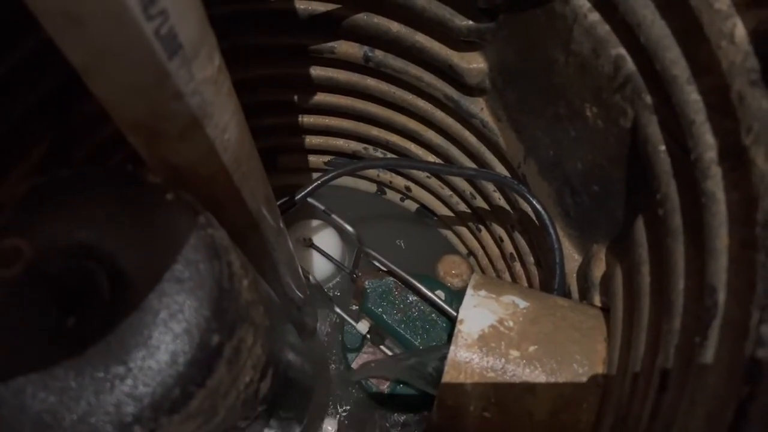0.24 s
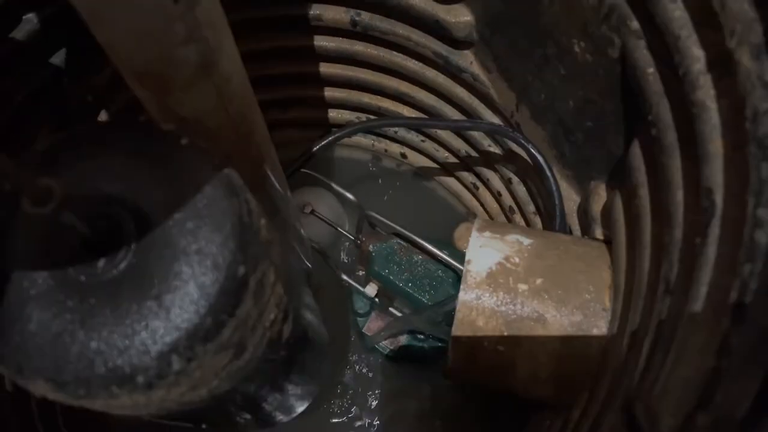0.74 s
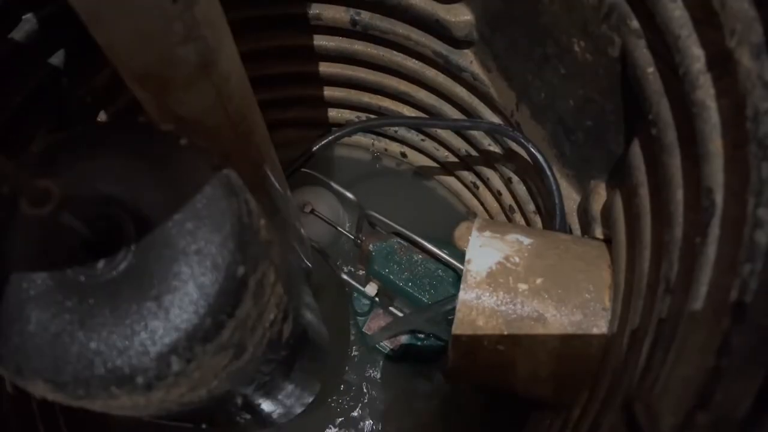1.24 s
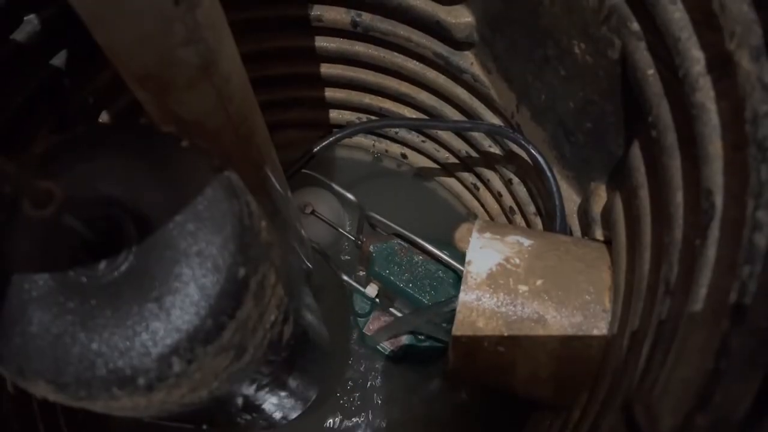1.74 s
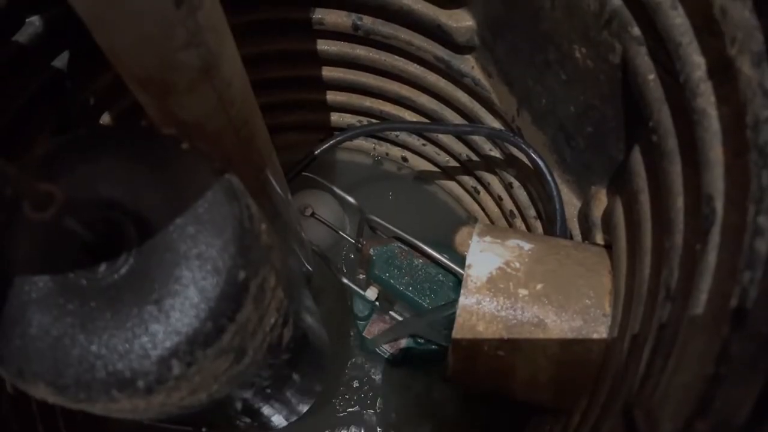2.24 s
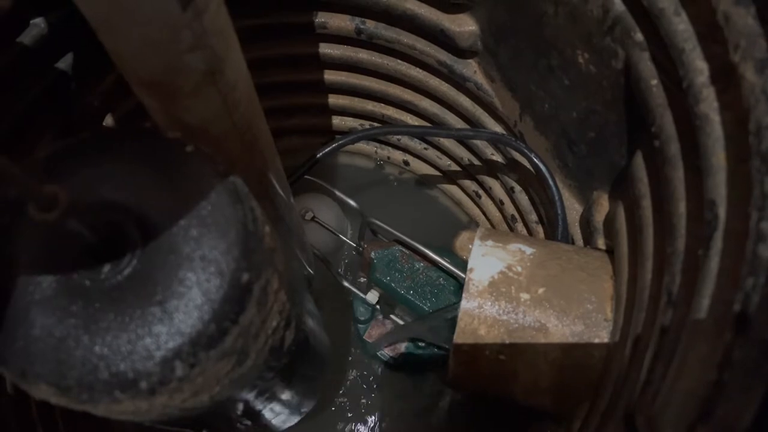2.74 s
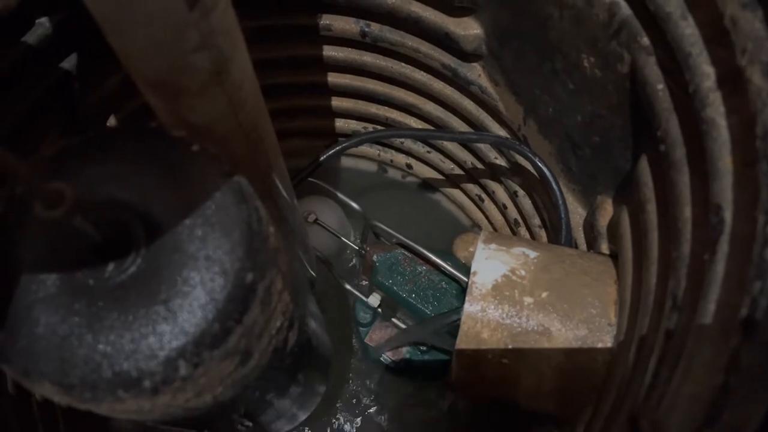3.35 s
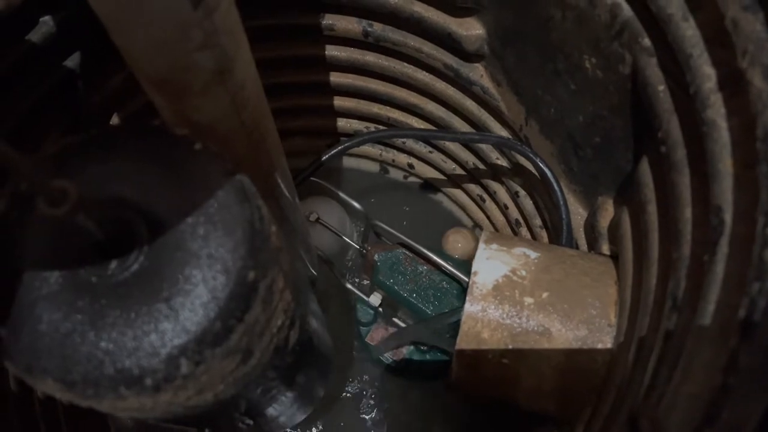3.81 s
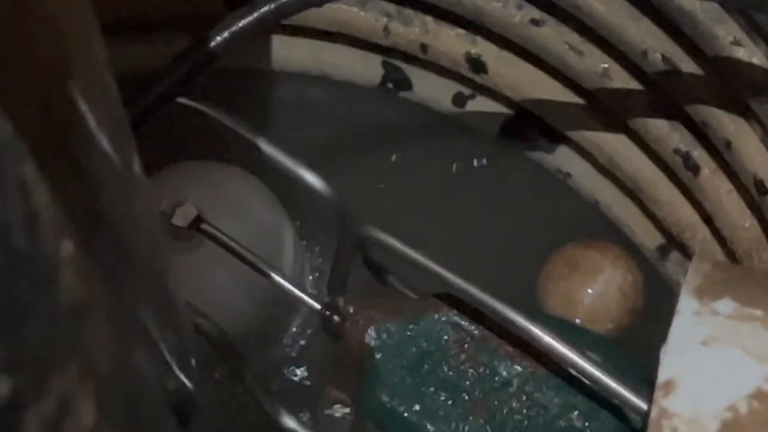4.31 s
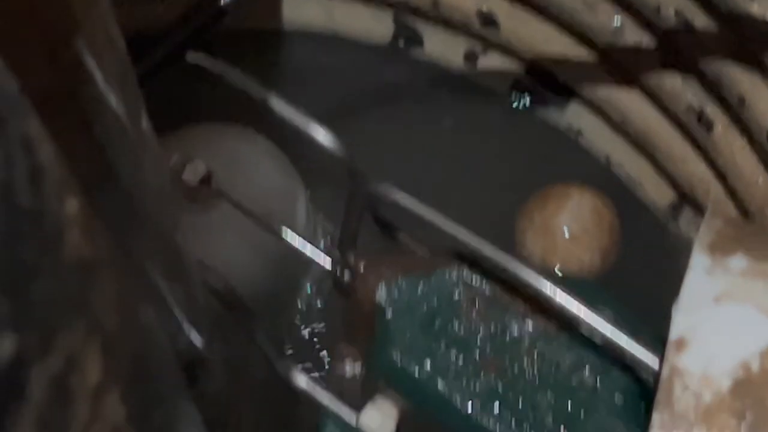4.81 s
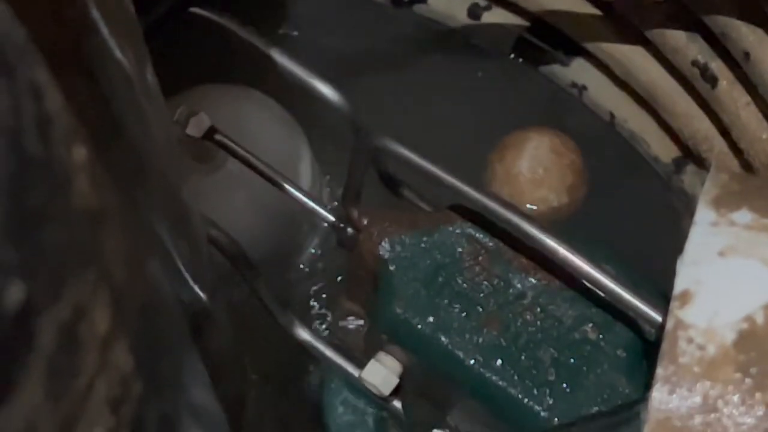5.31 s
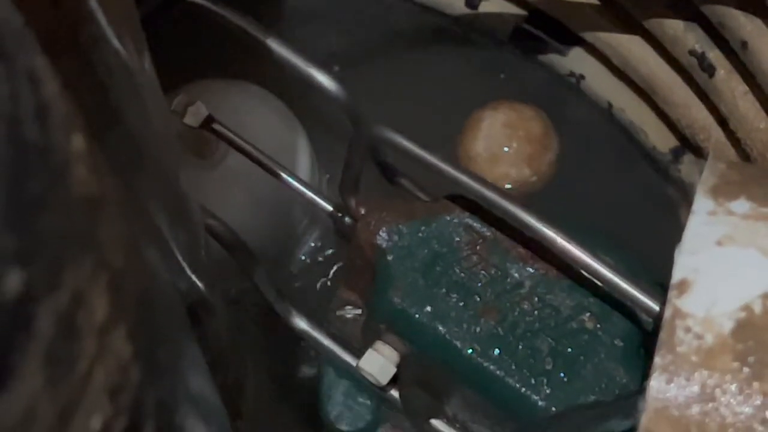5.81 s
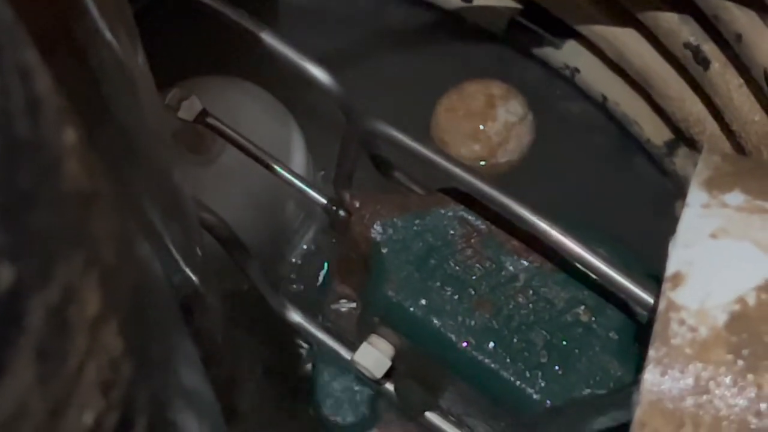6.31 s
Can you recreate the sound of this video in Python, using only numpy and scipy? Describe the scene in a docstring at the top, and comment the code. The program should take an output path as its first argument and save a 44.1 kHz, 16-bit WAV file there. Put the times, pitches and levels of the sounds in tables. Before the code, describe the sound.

In a basement, heard close above a ribbed plastic sump pit, the first 0.7 seconds hold only faint, hollow, wavering air, a thin hiss and tiny drips near 0.25, 0.4 and 0.6. At 0.72 drain water abruptly begins to splatter: irregular clumps of drops, crisp splashes, ringing plips and low hollow gulps, with short lulls around 1.5, 1.8 and 2.4 and a soft deep boom of stirred air. At about 2.44 the float clacks loudly and the switch snaps, a dry crack with a very high, brief ring and two weaker rebounds. A steady low motor hum near 120 Hz starts at once. From 2.55 to 2.8 a jet builds into dense, fizzing spray with fast gargling bubbles. It runs to the end at about 6.7, swelling slightly after 3.8 while the hum eases after 4, with a low shifting gurgle and bigger plops, a strong boomy one near 5.0.

```python
"""Basement, just above the rim of a ribbed plastic sump pit with a submersible pump in it.
Quiet air with a few faint drips, then drain water splatters and plops: bursts of tiny impacts and ringing bubbles.
A float clacks, its switch snaps (a crack and a high ring) and the motor hums near twice the mains frequency.
A jet from the weep hole sprays (random drops, filtered) and churns the water (a shifting resonance)."""
import sys
import numpy as np
from scipy import signal
from scipy.fft import rfft, irfft, next_fast_len
from scipy.io import wavfile
from scipy.ndimage import map_coordinates

SR = 44100
rng = np.random.default_rng(int(sys.argv[2]) if len(sys.argv) > 2 else 0)


def transcribe(u):
    """Save the signal u as a 16-bit wav file named by the first command-line argument.

    u: samples, shape (n,) or (channels, n), limited to [-1, 1]; the rate is SR.
    q: integer samples, one column per channel.
    """
    v = np.clip(np.atleast_2d(u).T, -1, 1)
    q = np.round(v * 32767).astype(np.int16)
    wavfile.write(sys.argv[1], SR, q)


N = 289296
TIME = np.arange(N) / SR
INFLOW_START, INFLOW_RISE_S = .72, .0039  # the water sound begins all at once
JET_START, JET_BUILD_S = 2.547, .23  # pressure builds as the impeller comes up to speed
INFLOW_WIDTH = 4.9  # drain water falls near the wall, so its echoes differ more between left and right
# ring length in cycles, spread in time, relative spread in pitch
BUBBLE = dict(cycles=6.6, spread_s=.0038, scatter=.059)


def amp(db):
    """Turns decibels into a gain."""
    return 10 ** (np.asarray(db) / 20)


def evened(x):
    """Scales to an rms of one."""
    return x / np.sqrt(np.mean(x ** 2) + 1e-20)


def read(points, hz):
    """Reads a table between its points, on a log-frequency axis."""
    f, value = np.transpose(points)
    return np.interp(np.log(hz + 1), np.log(f + 1), value)


def level(rows):
    """Reads a (t/s, level/dB) curve at every sample."""
    return np.interp(TIME, *np.transpose(rows))


def add(mix, s, sound):
    """Mixes a sound in at time s."""
    part = mix[max(round(s * SR), 0):][:len(sound)]
    part += sound[:len(part)]


def onset(start, rise_s):
    """Gain that climbs in a straight line from silence to one and holds."""
    return np.clip((TIME - start) / rise_s, 0, 1)


def chance_times(per_s):
    """Random moments from the start of the inflow on."""
    return rng.uniform(INFLOW_START, N / SR, round(per_s * (N / SR - INFLOW_START)))


def wander(hz):
    """Slow random drift of unit rms, with little movement faster than about hz."""
    size = next_fast_len(N)
    f = np.fft.rfftfreq(size, 1 / SR)
    spectrum = rfft(rng.standard_normal(size)) / (1 + (f / hz) ** 4)
    return evened(irfft(spectrum)[:N])


def colour(x, points, modes=(), size=4096):
    """Filters without pre-echo, from a spectrum with peaks and dips; white noise keeps its power."""
    hz = abs(np.fft.fftfreq(size, 1 / SR))
    db = read(points, hz) + sum(lift / (1 + (2 * (hz - f) / width) ** 2) for f, width, lift in modes)
    # The Hilbert transform of the log gain gives the minimum phase.
    taps = np.fft.ifft(np.exp(np.conj(signal.hilbert(np.log(amp(db)))))).real
    return signal.oaconvolve(x, taps / np.linalg.norm(taps))[:len(x)]


def mottle(x, depth_db, patch_s=.03, patch_octaves=.2493):
    """Shifting colour: patches of the spectrum swell and fade independently, less so in the treble."""
    hz, t, z = signal.stft(x, SR, nperseg=512, noverlap=384)
    places = np.meshgrid(np.log2(1 + hz / 500) / patch_octaves, t / patch_s, indexing="ij")
    field = evened(map_coordinates(rng.standard_normal((64, 512)), places, order=1, mode="wrap"))
    gain = amp(depth_db * field / (1 + hz[:, None] / 5000))
    gain = gain / np.sqrt(np.mean(gain ** 2, 1, keepdims=True))  # mean power gain of one at each frequency
    return signal.istft(z * gain, SR, nperseg=512, noverlap=384)[1][..., :N]


def resonate(x, hz, width):
    """A resonance that follows the curve hz: shift down to zero, smooth, shift back up."""
    turn = np.exp(2j * np.pi * np.cumsum(hz) / SR)
    r = np.exp(-np.pi * width / SR)
    return 2 * (turn * signal.lfilter([1 - r], [1, -r], x / turn)).real


def droplets(count, per_s, spread_db):
    """Random impacts, many small and a few large, over count samples."""
    size = amp(spread_db * np.minimum(rng.exponential(1, count), 4))
    sign = rng.choice([-1, 1], count)
    return evened(size * sign * (rng.random(count) < per_s / SR))


def plink(hz, cycles, rise=.034):
    """A trapped bubble rings for some cycles, rising in pitch as it nears the surface."""
    age = np.arange(SR // 16) / SR / min(cycles / hz, .01)  # decay time is 10 ms at most
    pitch = hz * (1 + rise * (np.minimum(age, 2) - 1 / 2))
    return (1 - np.exp(-3 * age)) * np.exp(-age) * np.sin(2 * np.pi * np.cumsum(pitch) / SR)


def cluster(hz, cycles, spread_s, scatter, count=11):
    """A pocket of air breaks into bubbles of nearly one size; as strong as 10 ms at unit rms."""
    out = np.zeros(SR // 8)
    delays, shifts = rng.gamma(2, 1, count), rng.standard_normal(count)
    for late, shift, size in zip(delays, shifts, rng.uniform(-.93, 1, count)):
        add(out, late * spread_s, size * plink(hz * np.exp(scatter * shift), cycles))
    return out / np.sqrt(np.sum(out ** 2) / (.01 * SR))


def froth(per_s, cycles, spread_db, count=24):
    """Random bubbles of all sizes, somewhat stronger toward high pitches."""
    out = np.zeros(N)
    for hz in np.geomspace(450, 8000, count):
        ring = evened(plink(hz * rng.uniform(.96, 1.04), cycles))
        hits = droplets(N, per_s / count * np.sqrt(hz / 2000), spread_db)
        out += signal.oaconvolve(hits, ring)[:N] * (hz / 2000) ** (1 / 4)
    return evened(out)


# chosen stereo likeness of the diffuse part by frequency: f/Hz, likeness (0-1)
STEREO_LIKENESS = [(300, 1), (480, .2), (750, 0), (1300, .55), (2500, .75), (3700, .35), (4500, .6),
                   (7000, .8), (8500, .55), (9300, 1), (10700, 1), (11500, .8), (15500, .75)]
# time the echoes take to fall by 60 dB: f/Hz, decay/s
ECHO_DECAY = [(200, 0.21), (1000, 0.089), (2600, 0.13), (7000, 0.093), (15000, 0.1)]


def pit(x, wet_db, width=1, size=16384):
    """One spot in the pit, in stereo: the direct path and dense echoes from the ribbed wall."""
    taps = rng.standard_normal((2, size)) * (rng.random((2, size)) < 1 / 2)
    hz, t, z = signal.stft(taps, SR, nperseg=256)
    same = np.clip(read(STEREO_LIKENESS, hz), 0, 1)[:, None] ** abs(width)
    z[1] = same * z[0] + np.sqrt(1 - same ** 2) * z[1]
    z *= np.exp(-np.log(1000) * t / read(ECHO_DECAY, hz)[:, None])
    tail = signal.istft(z, SR, nperseg=256)[1]
    paths = amp(wet_db) * tail / np.linalg.norm(tail[0])
    paths[:, 0] += 1  # direct path
    return signal.oaconvolve(x[None], paths / np.linalg.norm(paths[0]), axes=1)[:, :N]


# chosen phase difference, left minus right, opposed near 10 kHz: f/Hz, phase/radians
STEREO_PHASE = [(50, .08), (120, .12), (400, .1), (700, .85), (1400, 0), (7900, 0), (8700, -1.3),
                (9200, -3.0), (10800, -3.2), (11500, -4.4), (12900, -6.2), (14200, -6.4), (15000, -7.9),
                (15800, -8.9)]
# chosen level difference, left minus right: f/Hz, level/dB
STEREO_BALANCE = [(100, .5), (450, -.8), (750, 1.6), (1050, 3), (1500, .4), (6000, .5), (9000, 0)]


def stereo_offsets(x):
    """Sets phase and level differences between left and right by frequency; opposed near 10 kHz."""
    size = next_fast_len(N + SR // 4)
    hz = np.fft.rfftfreq(size, 1 / SR)
    half = amp(read(STEREO_BALANCE, hz) / 2) * np.exp(1j * read(STEREO_PHASE, hz) / 2)
    return irfft(rfft(x, size) * np.array([half, 1 / half]), size)[:, :N]


# relative spectrum of the quiet basement air: f/Hz, level/dB
AIR_SPECTRUM = [(100, -38), (200, -17), (330, -5), (600, -6), (750, -9), (1000, -23.5), (1400, -21.5),
                (2500, -26), (4500, -36), (12000, -82), (15500, -20)]
# its hollow resonances: f/Hz, width/Hz, lift/dB
AIR_RESONANCES = [(500, 270, 9.6), (1725, 300, 17.5), (1924, 260, 11), (3380, 200, 18)]


def basement():
    """Hollow, faint air noise that wavers, a light crackle of distant drips, and a thin hiss on each side."""
    air = amp(-56.5) * colour(rng.standard_normal(N), AIR_SPECTRUM, AIR_RESONANCES)
    flutter = wander(hz=40)
    drips = amp(-70) * colour(droplets(N, per_s=900, spread_db=2.5) * amp(3 * flutter), WATER_SPECTRUM)
    hiss_shape = [(500, -37), (3000, -5), (6000, -4), (14000, -15)]
    hiss = np.array([colour(side, hiss_shape) for side in rng.standard_normal((2, N))])
    return mottle(air, depth_db=4.0, patch_s=.02) + drips + amp(-67.5 + 2.5 * flutter) * hiss


# relative spectrum of the air in the shaft, stirred by the water: f/Hz, level/dB
SHAFT_SPECTRUM = [(15, -33), (30, -15), (50, -2.5), (80, 5.5), (120, -4.5), (160, -17.5), (220, -18),
                  (500, -81)]


def shaft():
    """The column of air in the pit booms as the water moves, and slowly eases."""
    db = -39 - 0.5 * (TIME - INFLOW_START)  # eases by 0.5 dB per second
    gain = amp(db) * onset(INFLOW_START, INFLOW_RISE_S)
    return gain * evened(colour(rng.standard_normal(N), SHAFT_SPECTRUM))


# lulls in the drain stream: middle t/s, time from the middle to 1/e of the depth/s, depth level/dB
STREAM_LULLS = [(1.495, 0.056, -3.5), (1.792, 0.035, -4.5), (2.377, .025, -4)]


def flow_db(s):
    """Strength of the drain stream at time s, which thins out in each lull."""
    return sum(db * np.exp(-((s - middle) / half) ** 2) for middle, half, db in STREAM_LULLS)


# relative spectrum of falling drain water: f/Hz, level/dB
WATER_SPECTRUM = [(60, -20), (130, -26), (200, 4), (300, 13), (360, 7), (480, -18), (800, 1), (1800, -1.5),
                  (2800, 2.5), (3700, -3), (5000, -1.5), (8000, 4.5), (12000, 5), (15500, 3)]
# colour of the water sound, peaks and dips, with a deep gap near 10 kHz: f/Hz, width/Hz, lift/dB
WATER_COLOUR = [(555, 29, 10.5), (664, 51, -16.5), (772, 98, 6.5), (1070, 54, 8), (1246, 54, -11),
                (1350, 140, 3), (2750, 89, 3), (5270, 70, 7), (8980, 750, 11), (9810, 910, -62),
                (10900, 1800, 6.5)]


def inflow():
    """A broken stream: clumps of small drops that trap tiny bubbles."""
    clumps = wander(hz=23.2)
    drops = droplets(N, per_s=700, spread_db=6.0) * amp(2.6 * clumps)
    patter = amp(-43.5) * evened(colour(drops, WATER_SPECTRUM, WATER_COLOUR))
    plinks = amp(-50) * evened(froth(per_s=400, cycles=5, spread_db=3) * amp(2 * clumps))
    stream = mottle(patter + plinks, depth_db=3.5)
    stream = stream * amp(flow_db(TIME)) * onset(INFLOW_START, INFLOW_RISE_S)
    return pit(stream, wet_db=6, width=INFLOW_WIDTH)


# short noisy bursts: faint drips first, then splashes, and the float's clack at 2.435 s; relative levels:
# t/s, whole level/dB, body (low part) level/dB, fizz (treble) level/dB
MAIN_BURSTS = [(.246, -53, -5, -19), (.402, -60, -11, -11), (.611, -55, -14, -13), (.783, -40, -9, 0),
               (.826, -36, -1, -24), (.891, -29, -2, 5), (.927, -31.5, -12, 16), (.976, -34.5, -20, 4),
               (1.046, -33, 0, -1), (1.086, -37, 0, 11), (1.121, -30.5, 0, -1), (1.187, -39, 0, -16),
               (1.258, -30, -15, -1), (1.288, -34, -9, 2), (1.317, -36, 1, -25), (1.327, -30, -8, -4),
               (1.424, -31, -14, -1), (1.523, -39, -13, 0), (1.581, -40, -8, 2), (1.629, -33.5, -22, -2),
               (1.691, -34, -13, -4), (1.799, -37.5, 0, 8), (1.85, -38, -3, -4), (1.906, -35.5, -8, 1),
               (1.934, -38, -15, -3), (1.964, -38, 3, 0), (1.982, -35, -12, 4), (2.013, -33, -15, 6),
               (2.067, -32.5, -2, 4), (2.123, -31.5, -6, 2), (2.182, -33.5, -22, -2),
               (2.245, -32.5, -10, -4), (2.283, -33, -15, 3), (2.342, -41, -2, -9), (2.435, -22, -7, -2),
               (2.625, -28.5, -1, 0)]


def noisy_bursts(count=9, size=3):
    """Drips, splashes and the float's clack: clouds of tiny impacts with random lifts and dents in pitch."""
    spots, t = np.zeros((size, N)), np.arange(SR // 8) / SR
    # Lesser splashes fall at random: whole, body and fizz levels, then their spreads in dB.
    small = [(s, *rng.normal([-37.5 + flow_db(s), -7.5, -9], [2, 6, 5])) for s in chance_times(per_s=5.3)]
    for k, (s, db, body_db, fizz_db) in enumerate(MAIN_BURSTS + small):
        age = t / rng.uniform(.0036, .0062)
        cloud = droplets(len(t), per_s=5000, spread_db=2.3) * age ** 1.4 * np.exp(-age)
        spit_db = 1.5 + 0.41 * fizz_db  # the spit near 5-9 kHz follows the fizz
        tilt = [(150, body_db - 13.0), (400, body_db + 7.5), (850, body_db + 3.5), (1900, 0), (4000, 0),
                (5500, spit_db), (8500, spit_db), (12000, fizz_db)]
        pitches = np.geomspace(700, 8000, count) * rng.uniform(.9, 1.1, count)
        dents = [(hz, hz / 6, rng.normal(0, 2.8)) for hz in pitches]
        add(spots[k % size], s - .002, amp(db) * colour(cloud, tilt, dents))
    coloured = [amp(6.5) * colour(spot, WATER_SPECTRUM, WATER_COLOUR) for spot in spots]
    return sum(pit(spot, wet_db=-0.5, width=INFLOW_WIDTH) for spot in coloured)


# pockets of air that break into small bubbles: t/s, pitch f/Hz, relative level/dB
AIR_POCKETS = [(.51, 7900, -61), (.780, 2650, -39), (0.822, 2960, -40), (.965, 2500, -45.5),
               (1.049, 1450, -46), (1.101, 4540, -46), (1.184, 2600, -48), (1.313, 2480, -41),
               (1.419, 2200, -41.5), (1.622, 3020, -45), (1.645, 1900, -43), (1.645, 4260, -42.5),
               (1.717, 2870, -38.5), (1.718, 5100, -38.5), (1.847, 4620, -43), (1.867, 1440, -47),
               (1.9, 2350, -45), (2.012, 4830, -43.5), (2.216, 4100, -42.5), (2.368, 2720, -46),
               (2.418, 2850, -37), (2.564, 5350, -33.5), (3.075, 1680, -37.5), (3.382, 840, -37),
               (4.177, 1550, -33), (4.657, 1070, -37), (4.897, 6560, -31), (5.671, 997, -35),
               (6.182, 1430, -33), (6.34, 4000, -32)]


def bubbles():
    """Rough little plips in the water, each a cluster of bubbles."""
    out = np.zeros(N)
    low_hz, high_hz = 908, 5470  # lesser bubbles ring at random between these
    strays = [(s, low_hz * (high_hz / low_hz) ** rng.random(), -52.5 + flow_db(s))
              for s in chance_times(per_s=36)]
    for s, hz, db in AIR_POCKETS + strays:
        add(out, s, amp(db) * cluster(hz, **BUBBLE))
    return amp(2.0) * pit(out, wet_db=-1.5, width=INFLOW_WIDTH)


# water closing over a cavity, in relative levels: t/s, plop f/Hz, plop level/dB, boom f/Hz, boom level/dB
BIG_GULPS = [(.742, 660, -41, 340, -37.5), (.781, 680, -42, 337, -46), (.826, 620, -47, 340, -43),
             (0.885, 855, -40, 334, -37), (1.081, 655, -41, 342, -35), (1.113, 610, -46, 352, -47),
             (1.143, 710, -43.5, 353, -38.5), (1.198, 630, -43, 338, -31.5), (1.266, 626, -51, 333, -38),
             (1.365, 905, -41, 327, -45), (1.424, 930, -46, 340, -51), (1.69, 676, -40, 352, -36),
             (1.715, 900, -46, 340, -40), (1.825, 1030, -43, 324, -35), (1.856, 775, -40, 322, -37),
             (1.961, 1010, -35.5, 345, -42), (1.992, 1070, -46, 330, -36.5), (2.065, 695, -39, 350, -47),
             (2.241, 734, -36.5, 383, -40), (2.503, 900, -39, 400, -37), (2.889, 890, -27, 318, -31),
             (3.453, 1050, -29, 400, -43), (3.83, 725, -39, 393, -24), (4.139, 800, -49, 313, -27),
             (4.36, 1055, -35, 320, -39), (5.03, 1120, -32, 286, -18), (5.751, 895, -27.5, 312, -40),
             (5.949, 705, -39, 305, -28), (6.465, 1090, -26.5, 328, -25)]


def gulps():
    """A cavity closes with a short plop that echoes in the pit, and the large bubble it leaves booms."""
    plops, booms = np.zeros((2, N))
    # Lesser gulps come at random once the jet is up.
    strays = [(s, rng.uniform(550, 1400), -48.5, rng.uniform(280, 440), -42)
              for s in chance_times(per_s=5.1) if s > JET_START + JET_BUILD_S]
    for s, plop_hz, plop_db, boom_hz, boom_db in BIG_GULPS + strays:
        plop = cluster(plop_hz, cycles=3.04, spread_s=.003, scatter=.1)
        boom = cluster(boom_hz, cycles=4.2, spread_s=.00293, scatter=.038, count=2)
        add(plops, s, amp(plop_db) * plop)
        add(booms, s, amp(boom_db) * boom)
    return amp(-3.0) * (pit(plops, wet_db=-1.5) + booms)


# churning of the pool while the pump runs: t/s, pitch f/Hz, relative level/dB
POOL_CHURN = [(2.9, 325, -38), (3.3, 345, -41), (3.85, 358, -36.5), (4.2, 315, -38.5), (5.15, 311, -35.5),
              (6.5, 308, -38.5)]


def churn(width=160):
    """Large bubbles gurgle in one broad, shifting resonance, faint at first and strong once the pump runs."""
    s, hz, db = np.transpose(POOL_CHURN)
    centre = np.interp(TIME, s, hz) + 15 * wander(hz=2.2)  # pitch drifts by about 15 Hz
    pumped = amp(np.interp(TIME, s, db)) * onset(start=2.524, rise_s=.16)
    stirred = amp(-57) * onset(INFLOW_START, INFLOW_RISE_S)  # by the inflow alone
    gain = np.hypot(stirred, pumped)
    drops = droplets(N, per_s=400, spread_db=3.0)
    gurgle = evened(resonate(resonate(drops, centre, width), centre, width))
    return gain * amp(1.46 * wander(hz=17.0)) * gurgle


# snap and rebounds of the switch contact: t/s, relative level/dB
CONTACT_HITS = [(2.4452, -4), (2.4503, -15), (2.4562, -21)]
# ring of the contact: f/Hz, relative level/dB, time to fall by 60 dB/s
CONTACT_RING = [(14720, 4, 0.013), (14730, 0, 0.0086), (13800, -10, 0.0076), (12100, -15, 0.0025),
                (8700, -14.5, 0.0042)]


def float_switch():
    """The contact snaps shut with a dry crack and a very high ring, and rebounds twice."""
    out, t = np.zeros(N), np.arange(SR // 16) / SR
    ring = sum(amp(db) * np.exp(-np.log(1000) * t / t60) * np.sin(2 * np.pi * hz * t)
               for hz, db, t60 in CONTACT_RING)
    ring = ring / abs(ring).max()
    crack = amp(-15) * rng.standard_normal(len(t)) * np.exp(-t / .00072)  # dies within a few ms
    for s, db in CONTACT_HITS:
        add(out, s, amp(db) * (ring + crack))
    return pit(out, wet_db=-4)


# strength of the jet once it is up, of which only the swing is used: t/s, level/dB
JET_STRENGTH = [(2.87, -32), (3.2, -36), (3.5, -36), (3.8, -33.5), (4.7, -31), (5.2, -31), (6.05, -31),
                (6.42, -33)]


def jet_swing_db():
    """How far the jet rises above or falls below its usual -33 dB."""
    return level(JET_STRENGTH) + 33


def gargle(count=3):
    """Air dragged under by the jet breaks up in a quick run of plops, each at its own pitch."""
    spots = np.zeros((count, N))
    low_hz, high_hz = 551.6, 2404
    for k, s in enumerate(chance_times(per_s=60)):
        hz = low_hz * (high_hz / low_hz) ** rng.random()
        add(spots[k % count], s, amp(rng.normal(-41.5, 2)) * cluster(hz, **BUBBLE, count=4))
    gain = onset(JET_START, JET_BUILD_S) ** 2 * amp(1.18 * jet_swing_db())
    return sum(pit(spot * gain, wet_db=0.5) for spot in spots)


# relative spectrum of the jet's spray: f/Hz, level/dB
SPRAY_SPECTRUM = [(60, -16), (145, 21), (200, -8.5), (280, 12.5), (450, 3.5), (650, 1.5), (850, 3.5),
                  (2000, -2.7), (3000, 3.1), (3800, -1.8), (5300, -5.5), (8000, 0.5), (12500, 4.5),
                  (15500, 2.5)]


def jet(count=5):
    """The jet lands on several spots: heavy drops splash, fine ones fizz, and air is beaten into bubbles."""
    out = np.zeros((2, N))
    swing_db = jet_swing_db()
    # Heavy drops land 26 ms after the fine spray and swing more than the jet does; the spray swings less.
    splash_gain = onset(JET_START + .026, JET_BUILD_S) ** 2 * amp(-34 + 1.18 * swing_db)
    fizz_gain = onset(JET_START, JET_BUILD_S) ** 2 * amp(-28 + 0.42 * swing_db)
    splash_shape = [(2000, 2), (4000, -4.5), (9000, -6.0), (16000, -10.5)]
    fizz_shape = [(800, -19.0), (2500, -8.0), (5000, 4.0), (16000, 0.5)]
    for spot in range(count):
        surge = wander(hz=32.8)
        heavy = droplets(N, per_s=600, spread_db=3.5) * amp(2 * surge)
        fine = droplets(N, per_s=4000, spread_db=0.5) * amp(2 * surge)
        splash = colour(evened(heavy), splash_shape) * splash_gain * amp(-2.13)
        fizz = colour(evened(fine), fizz_shape) * fizz_gain * amp(3.5)
        out += pit(colour(splash + fizz, SPRAY_SPECTRUM, WATER_COLOUR), wet_db=2)
    plinks = amp(-5.5) * splash_gain * froth(per_s=700, cycles=7, spread_db=3.2)
    return mottle(out / np.sqrt(count), depth_db=1.7) + pit(plinks, wet_db=-7.5)


# relative loudness of the motor hum: t/s, level/dB
HUM_LEVEL = [(2.5, -24.5), (2.58, -26.5), (2.65, -19), (2.89, -19), (3.04, -16.5), (3.13, -22),
             (3.18, -16.5), (3.86, -17), (5.13, -22), (5.17, -20.5), (6.5, -23)]
# its tones: multiple of the hum pitch, relative level/dB
HUM_TONES = [(1, -2), (2, -36), (3, -29.5), (4, -49), (5, -35.5), (6, -41)]


def motor():
    """Hum near twice the mains frequency, fluttering a little as water moves over the housing."""
    turn = 2 * np.pi * 119.92 * TIME  # hum pitch in Hz
    hum = sum(amp(db) * np.cos(round(k) * turn + 2 * np.pi * rng.random()) for k, db in HUM_TONES)
    flutter_db = 0.41 * wander(hz=12)
    return np.sqrt(2) * hum * onset(start=2.46, rise_s=.065) * amp(level(HUM_LEVEL) + flutter_db)


def scene():
    """Water, switch and motor sound in the pit, under the air of the basement."""
    water = inflow() + noisy_bursts() + bubbles() + gulps() + jet() + gargle() + churn() + shaft()
    return basement() + stereo_offsets(water + float_switch() + motor())


def record(dry):
    """A steep low-pass filter takes away the treble above about 15.9 kHz."""
    taps = signal.firwin(511, 15900, window=("kaiser", 9), fs=SR)
    return signal.oaconvolve(dry, taps[None], "same", axes=1)


dry = scene()
out = record(dry)
transcribe(out)
```